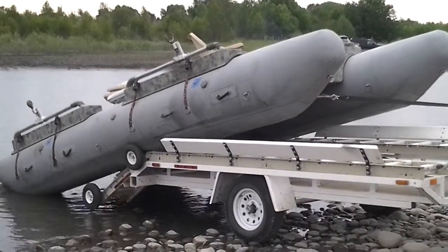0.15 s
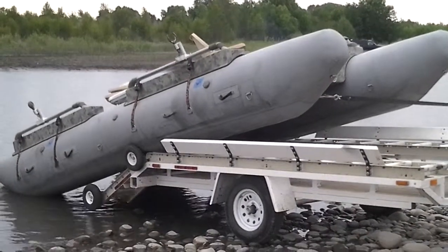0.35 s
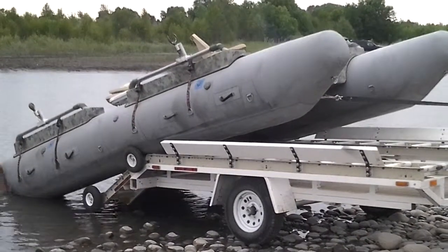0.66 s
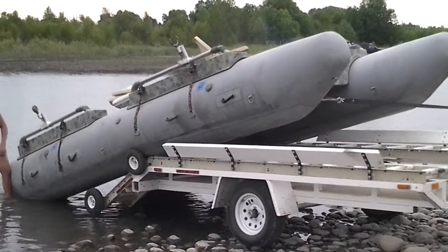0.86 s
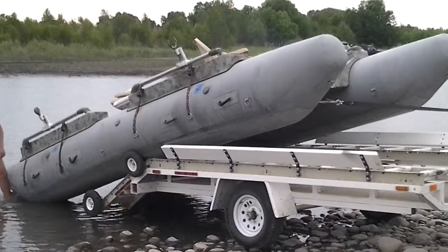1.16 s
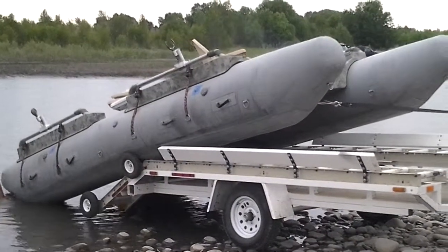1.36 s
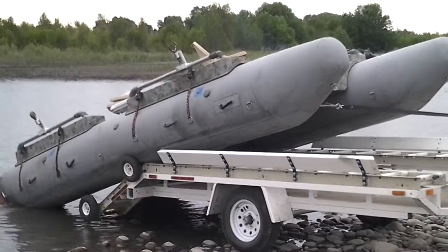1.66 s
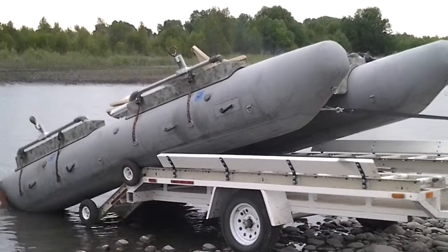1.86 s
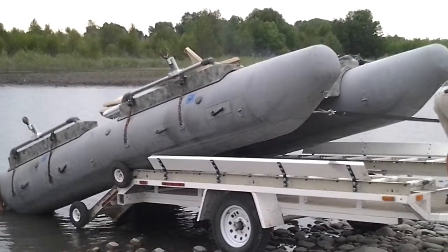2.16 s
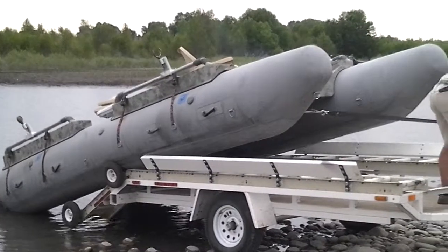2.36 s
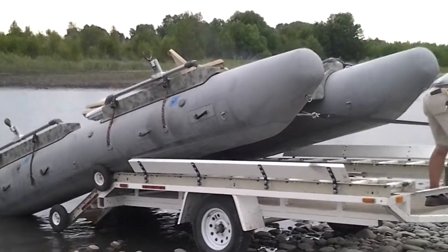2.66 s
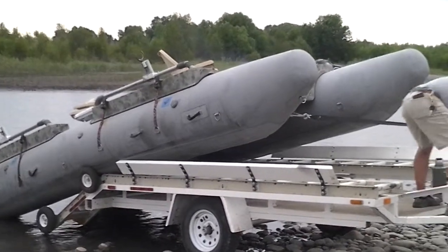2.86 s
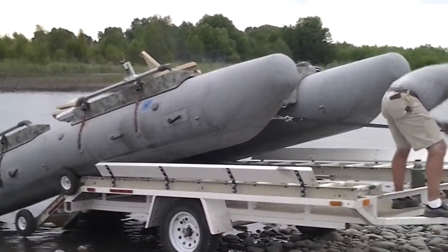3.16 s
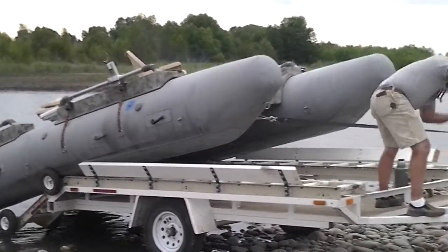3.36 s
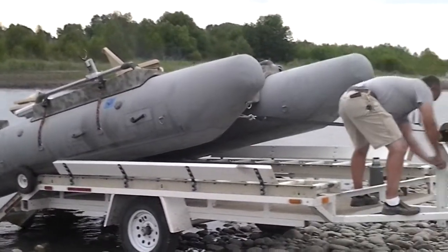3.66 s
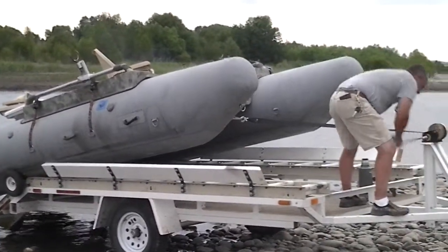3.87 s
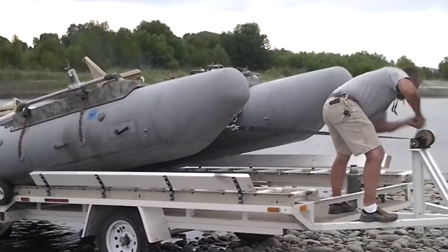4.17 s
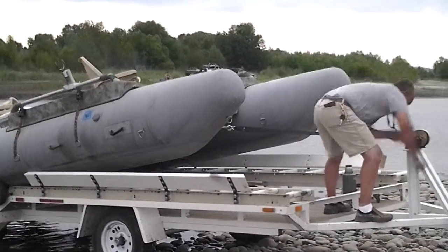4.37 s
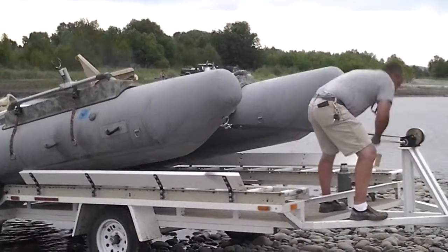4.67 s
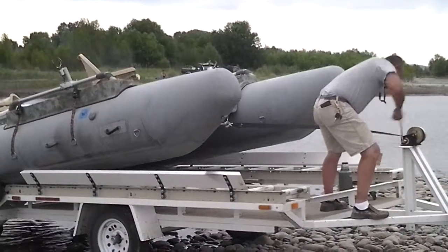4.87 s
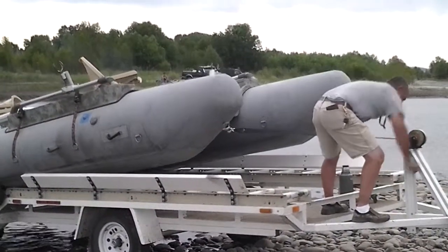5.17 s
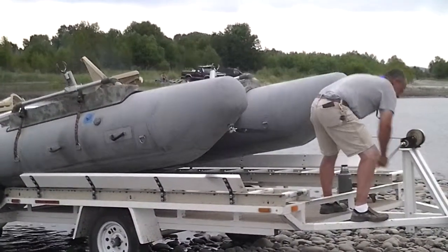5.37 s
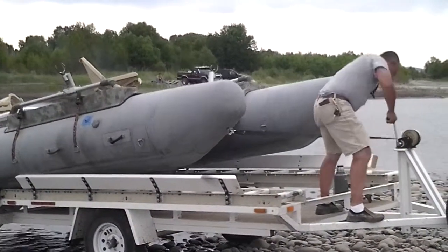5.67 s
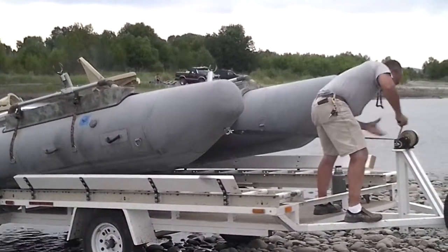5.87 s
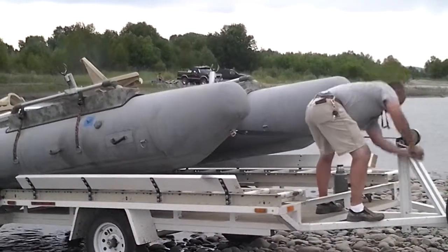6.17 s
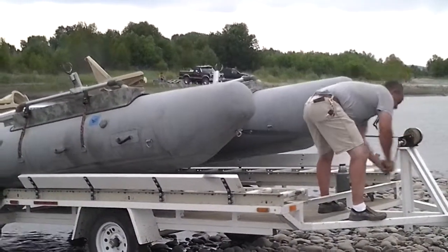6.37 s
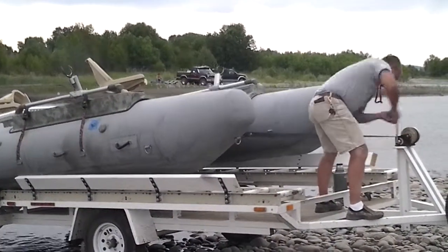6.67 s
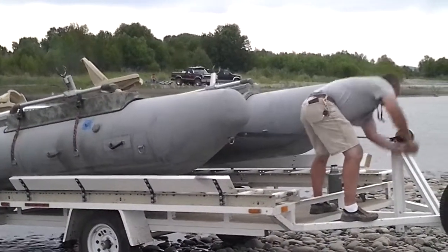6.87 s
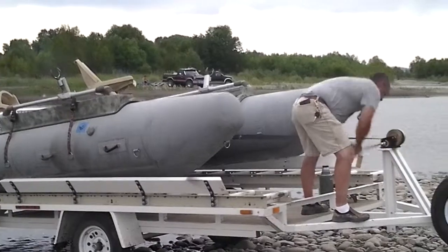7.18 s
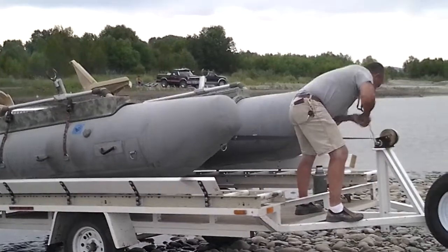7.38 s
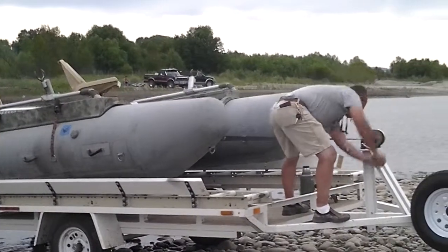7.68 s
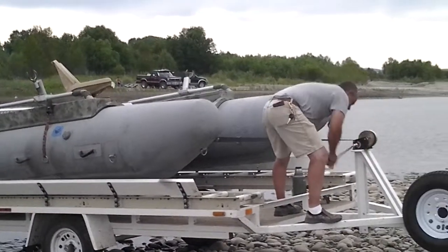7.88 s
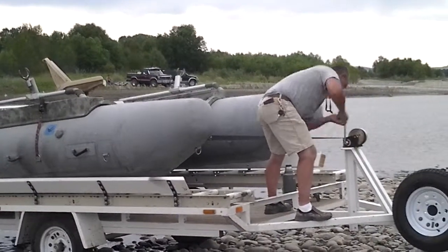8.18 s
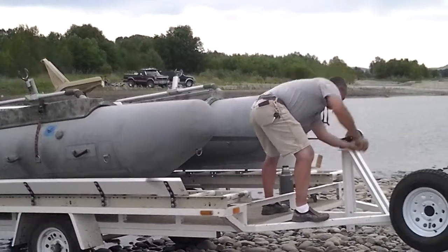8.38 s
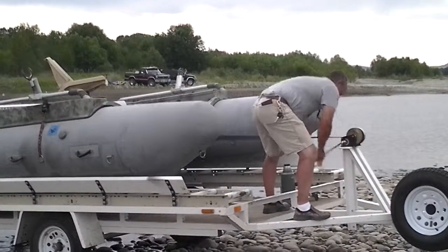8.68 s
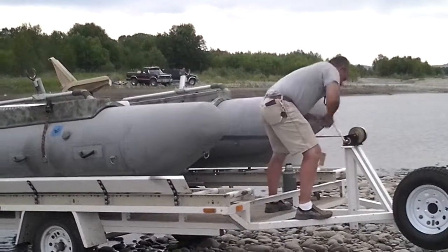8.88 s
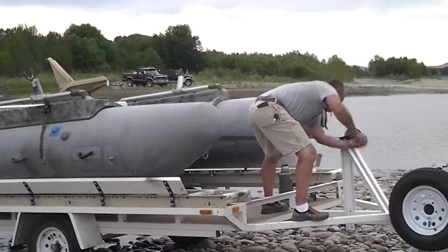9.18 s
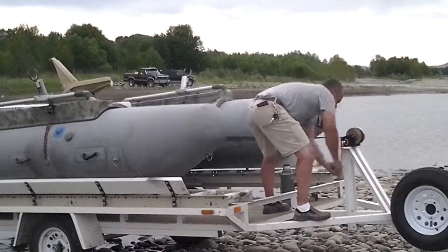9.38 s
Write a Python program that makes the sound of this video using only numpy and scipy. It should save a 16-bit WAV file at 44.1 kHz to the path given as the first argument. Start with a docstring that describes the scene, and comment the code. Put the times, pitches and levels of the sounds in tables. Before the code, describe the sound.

Rapid metallic clacking of a boat trailer winch being cranked in uneven strokes, with a river running softly behind.

```python
"""A hand winch hauls an inflatable boat onto its trailer; a river and a low handling rumble run throughout.
From the start the steel pawl drops over tooth after tooth, rebounds, and rings gears, wheel, post and frame.
Its pace swells and sags with each stroke; the crank stalls near 1.7 s. From 3.4 s soft dull bumps join in.
The crank stalls again near 5.8 s, then ratchets on to the end."""
import sys
import numpy as np
from scipy import signal
from scipy.fft import rfft, irfft, next_fast_len
from scipy.io import wavfile
from scipy.ndimage import uniform_filter1d, map_coordinates

SR = 44100
rng = np.random.default_rng(int(sys.argv[2]) if len(sys.argv) > 2 else 0)


def digitize_waveform(pressure):
    """Quantize a signal to 16-bit integers and store it at the path in sys.argv[1].

    Rows of a 2-D input are taken as channels; values are limited to [-1, 1].
    """
    field = np.atleast_2d(pressure).T
    bounded = np.clip(field, -1, 1)
    quanta = np.round(bounded * 32767).astype(np.int16)
    wavfile.write(sys.argv[1], SR, quanta)


N = 419832

# crank strokes: (start [s], teeth [count], first gap [ms], gap growth [ms/tooth],
# level [dB], post ring [dB], wheel ping [dB])
CRANK_STROKES = [(0.0196, 3, 89.7, -27.5, -15.5, 3, -6), (0.2205, 3, 49.3, 5.6, -15, 0, 2),
                 (0.421, 6, 71.2, -2.5, -15, 0, -1), (0.9092, 5, 67.8, -9.5, -15.5, 1, 5),
                 (1.162, 3, 59, 10.5, -15.5, -2.5, -2), (1.347, 3, 61.3, -1.1, -14, 0, 5.5),
                 (1.8888, 5, 77.9, -4, -17.0, 2.5, -6), (2.2505, 4, 73.7, -8, -16, 0.5, 3),
                 (2.5125, 5, 72.5, 1.15, -15, 0, 7), (2.8713, 8, 60.2, -1.95, -16.5, 1.5, 5.5),
                 (3.3102, 7, 63.8, 2.36, -16.5, 1, 4), (3.7875, 5, 57.2, 1, -15, -1, 1),
                 (4.0985, 5, 75.2, -4.5, -15, 1.5, 5), (4.4184, 3, 42.0, 6.5, -16.5, 1.5, -8),
                 (4.596, 6, 64.8, 2.5, -15.5, 3, 6), (5.0366, 4, 62.0, -7, -14.8, 3, -3),
                 (5.248, 3, 61.7, 43.9, -18.5, -0.5, 1), (5.4781, 4, 68.9, -4.5, -15, -1.5, 5.5),
                 (6.0984, 7, 89.0, -8, -16.5, 1, -1), (6.5734, 6, 50.4, 5.1, -15.5, -1.5, 3),
                 (6.9374, 7, 55, 0.32, -15.5, 1, -9), (7.3417, 6, 78.3, -3.5, -16, -0.5, -3),
                 (7.7517, 6, 47, 3, -15.5, -0.5, 0), (8.0848, 5, 77.3, -0.6, -16.2, -0.5, 4),
                 (8.4583, 8, 57.9, 0.96, -16, -1, 3), (8.9592, 3, 90.6, -3, -16, -5.5, -4),
                 (9.2099, 6, 63, -1.64, -16, -2, 0)]
# lone drops during stalls: (time [s], level [dB], post ring [dB], wheel ping [dB])
STALL_DROPS = [(1.7148, -28.5, 0.5, 7), (5.8307, -28.5, -1, 16.5), (5.9577, -20, -22, -4)]
# tooth-to-tooth spread: (level [dB], brightness [dB], post ring [dB], wheel ping [dB])
TOOTH_SPREAD_DB = [.5, 1.2, 1.8, 3.5]
# slip, fall and three rebounds of one drop: (delay [ms], strength [dB])
PAWL_CONTACTS = [(-1.66, -0.5), (1, 11), (3, 2), (5, -0.5), (7.5, -3)]
# dense steel clash: (frequency [Hz], relative density [dB])
CLASH_SPECTRUM = [(140, -26), (380, -14), (600, -18), (900, -10), (1350, -8), (1900, -2.5), (2400, -3.5),
                  (3600, -1.5), (5400, -2.5), (6400, -11), (8800, -15.5), (10600, -22), (12200, -24.5),
                  (14600, -31)]
# clash decay by band: (frequency [Hz], t60 [s])
CLASH_DECAY = [(500, 0.6), (1200, 0.4), (2000, 0.25), (3800, 0.15), (7000, 0.13), (12500, 0.078)]
# clash tilt with brightness: (frequency [Hz], gain [dB/dB])
CLASH_TILT = [(1800, -0.54), (6000, -0.31), (14000, 0.67)]
# gears and drum: (frequency [Hz], level [dB], t60 [s])
GEAR_MODES = [(1417, -25.5, 0.27), (1616, -17.5, 0.29), (1732, -15.5, 0.27), (1884, -10.5, 0.11),
              (1950, -10, 0.13), (2170, -10, 0.11), (2770, -12.5, 0.23), (2802, -8, 0.13),
              (2890, -6.5, 0.072), (3072, -9, 0.044), (3080, 1.5, 0.033), (3570, -12, 0.095),
              (3590, -8.5, 0.085), (3749, 2, 0.06), (3800, 0.5, 0.082), (3875, -1.5, 0.042),
              (4094, -3, 0.11), (4210, -6.5, 0.064), (4620, -4.5, 0.057), (4720, -5, 0.052),
              (4890, 0, 0.044), (4970, -8, 0.059), (5230, -9, 0.086), (5320, -16.5, 0.23),
              (5440, -6.5, 0.068), (5790, -6, 0.072), (8500, -24.5, 0.22), (11180, -18, 0.096)]
# ratchet wheel, a close pair: (frequency [Hz], level [dB], t60 [s])
WHEEL_MODES = [(2612, -4.5, 0.12), (2677, 0, 0.038)]
# winch post, close modes that beat: (frequency [Hz], level [dB], t60 [s])
POST_MODES = [(984, -7.5, .19), (1050, -1.5, .09), (1108, -4, .065)]
# trailer frame, upper mode gaining under load: (frequency [Hz], level [dB], t60 [s], drift [dB/s])
FRAME_MODES = [(449, -16, 0.23, -0.88), (486.5, -22.5, 0.18, 0.73)]
# dull bumps: (time [s], envelope peak [dB], frequency [Hz])
BUMPS = [(3.397, -28, 292), (3.843, -29, 200), (4.101, -24.5, 210), (4.231, -23.5, 254),
         (4.562, -25.5, 274), (4.859, -18.5, 300), (4.915, -23.5, 280), (5.298, -26.5, 212),
         (6.017, -22.5, 230), (6.19, -27, 250), (6.225, -18.5, 312), (6.492, -31, 220), (6.53, -16, 238),
         (6.688, -28, 240), (6.754, -27, 240), (7.061, -20.5, 205), (7.275, -25, 223), (7.741, -27, 316),
         (9.085, -28, 218)]
# handling rumble envelope: (time [s], level [dB])
HANDLING_LEVELS = [(0.0, -51), (0.58, -56), (1.53, -57.5), (5.04, -49.5), (5.62, -54), (6.73, -50),
                   (7.37, -55), (9.52, -53)]
# handling rumble and bump shudder: (frequency [Hz], relative density [dB])
RUMBLE_SPECTRUM = [(25, -9), (60, -3), (95, 0.5), (130, 8.5), (220, 7.5), (330, 4), (450, 5), (800, -45)]
# rushing water: (frequency [Hz], relative density [dB])
RIVER_SPECTRUM = [(120, -33), (240, 1.5), (450, 2), (620, -5), (1100, 0.5), (1500, -7), (4200, -7.5),
                  (6500, -18.5), (14000, -23.5)]

CLACK_SAMPLES, LEAD_SAMPLES = 10240, 88  # lead: room for the slip before the fall


def ratchet(echo_s=0.0095, steel_cutoff_hz=230, attack_s=0.03):
    """One clack per tooth: the pawl clashes and rings gears, wheel, post and frame."""
    times_s, level_db, bright_db, post_db, ping_db = pawl_drops()
    teeth = len(times_s)
    t = np.maximum(np.arange(CLACK_SAMPLES) - LEAD_SAMPLES, 0) / SR
    attack = t < attack_s
    clacks = clash(t, bright_db)
    clacks += amp(-7) * delayed(clacks, echo_s)  # off a nearby surface
    highpass = signal.butter(3, steel_cutoff_hz, "highpass", fs=SR, output="sos")
    clacks = signal.sosfilt(highpass, clacks)  # small parts radiate little bass
    clacks /= rms(clacks[:, attack])
    fall = ring(GEAR_MODES, t, teeth, rise_s=0.001, spread_db=3, spread_rad=1.12, memory=0.49)
    rebound = ring(GEAR_MODES, t, teeth, rise_s=0.001, spread_db=3, spread_rad=1.12, memory=0.49)
    rebound_s = PAWL_CONTACTS[-1][0] / 1000
    clacks += amp(-0.5) * (fall + amp(-2) * delayed(rebound, rebound_s))
    wheel = ring(WHEEL_MODES, t, teeth, rise_s=0.0017, spread_db=0.7, spread_rad=0.92, memory=0.33)
    clacks += amp(ping_db[:, None]) * wheel
    post = ring(POST_MODES, t, teeth, rise_s=0.0033, spread_db=1.8, spread_rad=0.73, memory=0.9)
    clacks += amp(post_db[:, None]) * post
    for *mode, drift_db_per_s in FRAME_MODES:
        frame = ring([mode], t, teeth, rise_s=0.002, spread_db=0.5, spread_rad=0.9, memory=0.24)
        clacks += amp(drift_db_per_s * times_s[:, None]) * frame
    clacks *= amp(level_db[:, None]) / rms(clacks[:, attack])
    track = np.zeros(N)
    for time_s, clack in zip(times_s, clacks):
        add(track, time_s - LEAD_SAMPLES / SR, clack)
    return track


def pawl_drops(usual_gap_s=0.069, settled_gap_s=0.076, usual_bright_db=0.73):
    """Time and levels of each drop; a pawl with time to settle falls harder and brighter."""
    drops = list(STALL_DROPS)
    for start_s, teeth, gap_ms, growth_ms, *levels_db in CRANK_STROKES:
        k = np.arange(teeth)
        elapsed_s = (k * gap_ms + k * (k - 1) / 2 * growth_ms) / 1000
        drops += [(start_s + s, *levels_db) for s in elapsed_s]
    times_s, level_db, post_db, ping_db = np.transpose(sorted(map(tuple, drops)))
    gaps_s = np.diff(times_s, prepend=times_s[0] - usual_gap_s)
    gap_doublings = np.log2(np.clip(gaps_s, usual_gap_s / 2, settled_gap_s) / usual_gap_s)
    level_db += 2.5 * gap_doublings
    bright_db = usual_bright_db + 1.8 * gap_doublings
    mean_db = np.array([level_db, bright_db, post_db, ping_db])
    scatter_db = TOOTH_SPREAD_DB * drifting(len(times_s), size=4, memory=0.23)
    return times_s, *(mean_db + scatter_db.T)


def clash(t, bright_db, crack_db=5.5, crack_t60_s=0.014, spread_db=5.5, ripple_db=2.5, memory=0.41):
    """Each pawl contact cracks and feeds a dense steel ring whose treble dies first."""
    teeth, size = len(bright_db), len(t)
    delay_ms, contact_db = np.transpose(PAWL_CONTACTS)
    bounce_stretch = 1 + 0.041 * rng.standard_normal((teeth, 1))
    onsets = np.abs(LEAD_SAMPLES + delay_ms * SR / 1000 * bounce_stretch).astype(int)
    blow_db = contact_db + spread_db * rng.standard_normal((teeth, len(contact_db)))
    blows = np.zeros((teeth, size))
    blows[np.arange(teeth)[:, None], onsets] = amp(blow_db) ** 2
    crack_power = amp(crack_db) ** 2 * decaying_power(blows, crack_t60_s)
    hz = np.fft.rfftfreq(size, 1 / SR)
    # each tooth favours its own narrow resonances
    ripple = uniform_filter1d(drifting(teeth, len(hz), memory), size=36, axis=1)
    tilt_db = bright_db[:, None] * log_interp(CLASH_TILT, hz)
    colour_db = log_interp(CLASH_SPECTRUM, hz) + tilt_db + ripple_db * ripple / rms(ripple)
    steel_spectrum = rfft(drifting(teeth, size, memory)) * amp(colour_db)
    centres_hz, t60s_s = np.transpose(CLASH_DECAY)
    clashes = np.zeros((teeth, size))
    for weights, t60_s in zip(np.eye(len(centres_hz)), t60s_s):
        band = irfft(steel_spectrum * log_interp(np.c_[centres_hz, weights], hz), size)
        power = crack_power + decaying_power(blows, t60_s)
        clashes += band * np.sqrt(power / power.mean())
    return clashes


def ring(modes, t, teeth, rise_s, spread_db, spread_rad, memory, detune=0.0048):
    """Struck modes swell and die; strength, phase and pitch shift as the wheel turns."""
    hz, level_db, t60_s = np.transpose(modes)[:, :, None]
    envelopes = amp(level_db - 60 * t / t60_s) * (1 - np.exp(-t / rise_s)) ** 2
    partials = envelopes * np.exp(2j * np.pi * hz * t)
    strengths = amp(spread_db * drifting(teeth, len(modes), memory))
    phasors = np.exp(1j * spread_rad * rng.standard_normal(strengths.shape))
    rings = ((strengths * phasors) @ partials).imag
    speeds = 1 + detune * rng.standard_normal(teeth)
    samples = np.arange(len(t))
    return np.array([np.interp(samples * speed, samples, row) for speed, row in zip(speeds, rings)])


def bumps(width_s=0.0038, shudder_s=0.033, shudder_db=-16):
    """Soft pushes of two or three cycles, each within a short low shudder."""
    pushes, shudder = np.zeros(N), np.zeros(N)
    t = np.arange(-SR // 10, SR // 10) / SR
    for time_s, peak_db, hz in BUMPS:
        tone = np.cos(2 * np.pi * (hz * t + rng.random()))
        add(pushes, time_s + t[0], amp(peak_db) * np.exp(-(t / width_s) ** 2) * tone)
        add(shudder, time_s + t[0], amp(peak_db + shudder_db) * np.exp(-np.abs(t) / shudder_s))
    return pushes + shudder * noise(RUMBLE_SPECTRUM)


def handling(swell_db=2):
    """Low, uneven rumble of handling."""
    level_db = np.interp(np.arange(N) / SR, *np.transpose(HANDLING_LEVELS))
    return amp(level_db + swell_db * wobble(knots_per_s=9.4)) * noise(RUMBLE_SPECTRUM)


def river(level_db=-48, swell_db=1.5):
    """Broad rush of water, wavering slightly."""
    return amp(level_db + swell_db * wobble(knots_per_s=6.4)) * noise(RIVER_SPECTRUM)


def amp(db):
    """Decibels to gain."""
    return 10 ** (np.asarray(db) / 20)


def rms(x):
    """RMS per row."""
    return np.sqrt(np.mean(x ** 2, axis=-1, keepdims=True) + 1e-20)


def log_interp(points, hz):
    """Read (frequency [Hz], value) points on a log axis."""
    knots_hz, values = np.transpose(points)
    return np.interp(np.log(hz + 1), np.log(knots_hz + 1), values)


def filtered(x, response):
    """Zero-phase filter of gain response(hz)."""
    size = next_fast_len(N + SR // 2)
    return irfft(rfft(x, size) * response(np.fft.rfftfreq(size, 1 / SR)), size)[..., :N]


def noise(spectrum):
    """Coloured noise, unit RMS."""
    x = filtered(rng.standard_normal(N), lambda hz: amp(log_interp(spectrum, hz)))
    return x / rms(x)


def wobble(knots_per_s):
    """Smooth random curve."""
    knots = rng.standard_normal(int(N * knots_per_s / SR) + 4)
    return map_coordinates(knots, [np.arange(N) * knots_per_s / SR])


def drifting(teeth, size, memory):
    """One random row per tooth; memory is the correlation of neighbours."""
    rows = rng.standard_normal((teeth, size))
    for k in range(1, teeth):
        rows[k] = memory * rows[k - 1] + np.sqrt(1 - memory ** 2) * rows[k]
    return rows


def decaying_power(blows, t60_s):
    """Exponential power tail of each blow."""
    return signal.lfilter([1], [1, -amp(-120 / (t60_s * SR))], blows)


def delayed(x, delay_s):
    """Delay each row, keeping its length."""
    return np.pad(x, ((0, 0), (round(delay_s * SR), 0)))[:, :x.shape[1]]


def add(track, start_s, sound):
    """Mix a sound into the track."""
    start = max(round(start_s * SR), 0)
    part = track[start:start + len(sound)]
    part += sound[:len(part)]


def scene():
    """Open air, straight ahead: both channels alike."""
    centre = ratchet() + bumps() + handling() + river()
    return np.array([centre, centre])


def record(dry):
    """Soft peak limiting, then a steep low-pass."""
    ceiling, hardness, cutoff_hz = 0.9, 6, 14800
    rounded = dry / (1 + np.abs(dry / ceiling) ** hardness) ** (1 / hardness)
    return filtered(rounded, lambda hz: 1 / np.sqrt(1 + (hz / cutoff_hz) ** 160))


dry = scene()
out = record(dry)
digitize_waveform(out)
```